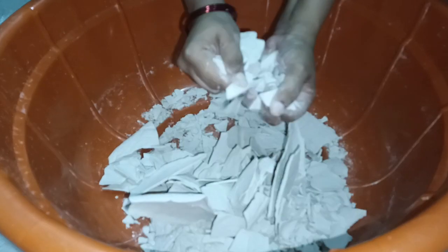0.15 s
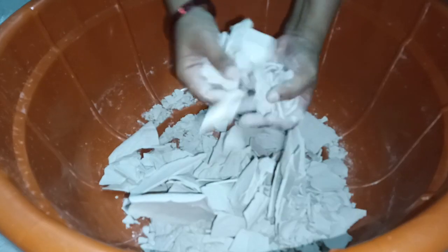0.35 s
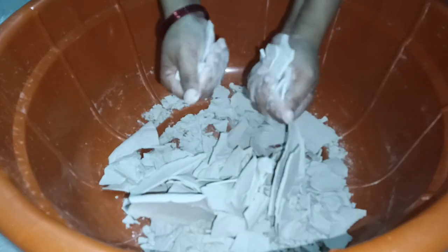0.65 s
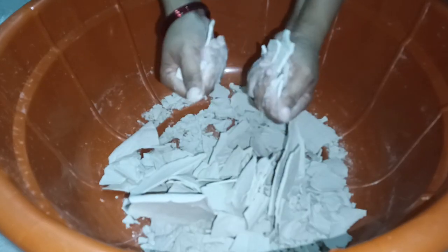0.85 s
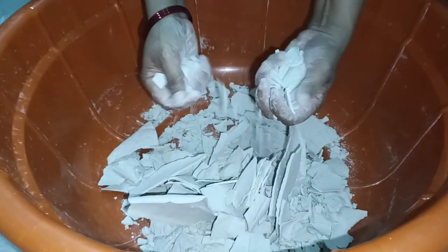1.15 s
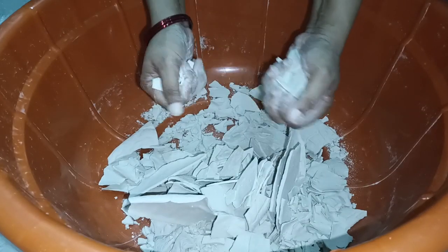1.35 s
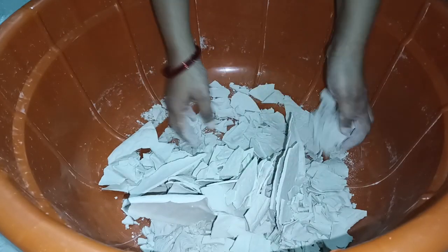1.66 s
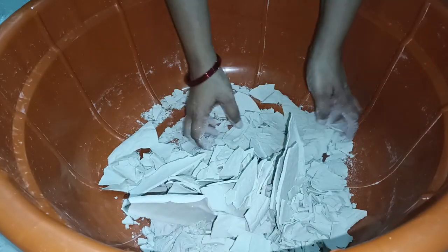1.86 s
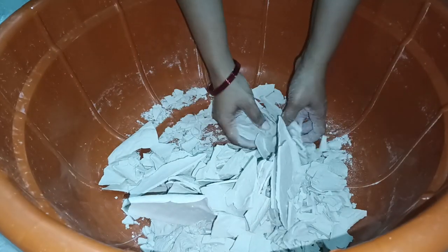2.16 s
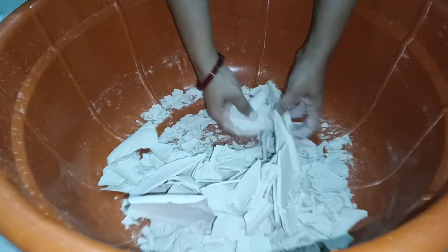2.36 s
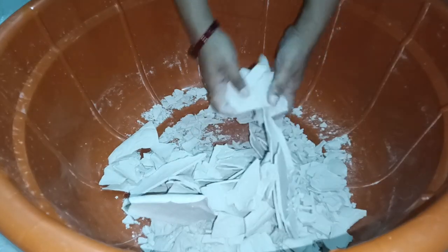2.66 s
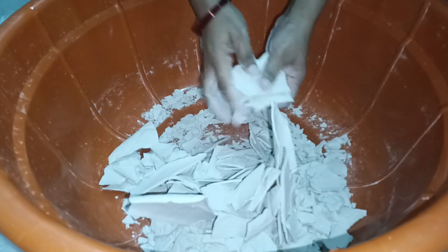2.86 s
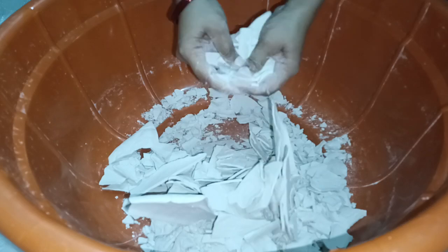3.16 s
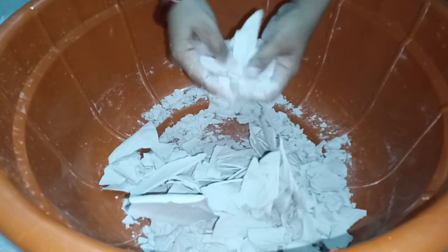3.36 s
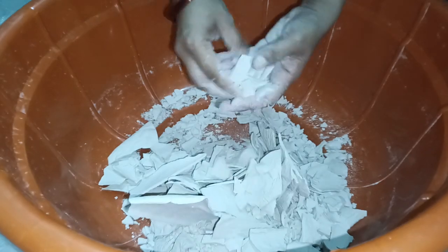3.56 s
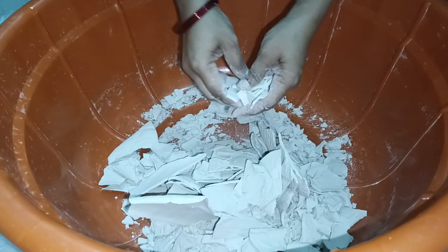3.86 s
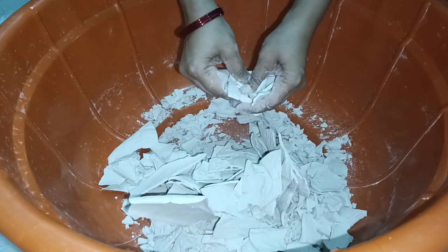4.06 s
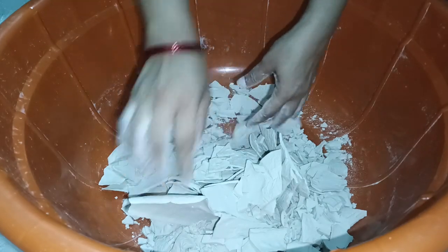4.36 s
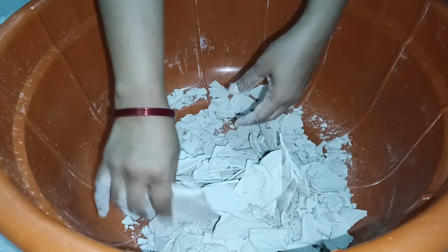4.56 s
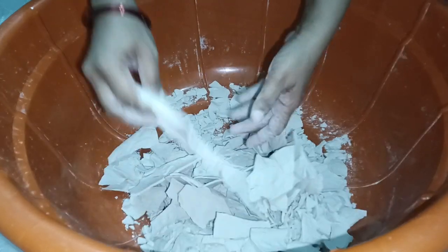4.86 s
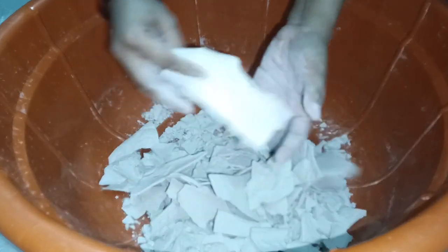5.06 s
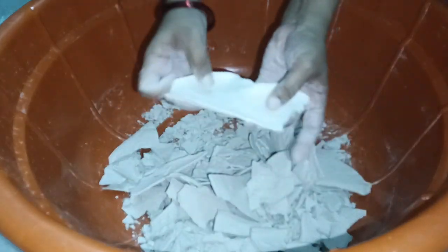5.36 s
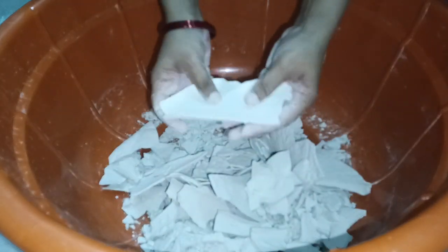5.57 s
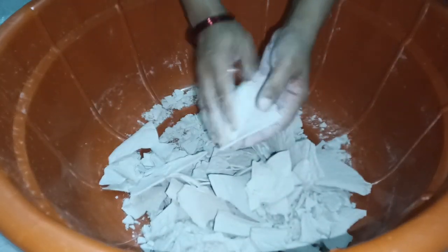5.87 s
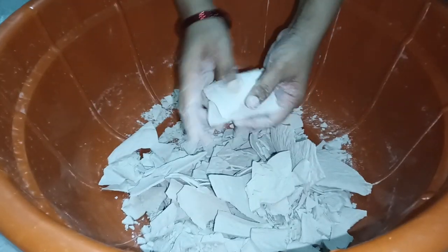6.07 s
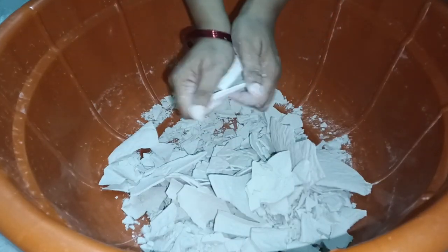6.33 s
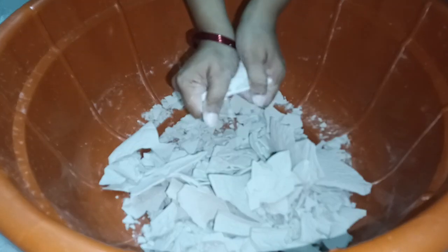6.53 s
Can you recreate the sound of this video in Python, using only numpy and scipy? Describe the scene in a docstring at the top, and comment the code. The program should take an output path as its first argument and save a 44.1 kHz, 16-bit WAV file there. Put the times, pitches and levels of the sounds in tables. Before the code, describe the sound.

Dry clay is crushed by hand close to a stereo microphone, over a plastic basin in a bare room with a short, slightly hollow echo. From 0 to 0.3 s, thin bright snaps and gritty grinding; from 0.5 to 0.75 s, a dense burst of hard cracks with chunks knocking the tub. A crack at 1.0 s, then crunching and clacks around 1.2-1.45 s. From 1.63 to 2.3 s, thick crumbling, strong knocks and sliding rubble, with a soft low bump at 2.0 s. Lighter crackling and knocks run from 2.4 to 4.1 s, snappier near 2.9-3.3 s. A loud crunch and clunk at 4.4-4.5 s is followed by faint rustling, then a solid break with a low bump around 5.2 s. Near quiet with tiny ticks until sharp snaps at 6.48 s and small ones until 6.65 s. Faint hiss and hum underneath.

```python
"""Two hands crush brittle slabs of dry clay over a wide plastic basin in a bare room.
From the start, filtered noise bursts crack the slabs and dense random grains grind crumbs in the fingers.
Soon chunks strike the basin as decaying sine modes and rubble taps slide on the heap; later the basin rocks.
A run of cracks ends the scene. Decaying sparse taps form the room; steady hiss and hum lie beneath,
and a pair of microphone ports hears it, the right one first, with a suppressor lowering faint tails."""
import sys
import numpy as np
from scipy import signal
from scipy.io import wavfile
from scipy.ndimage import uniform_filter1d

SR = 44100
rng = np.random.default_rng(int(sys.argv[2]) if len(sys.argv) > 2 else 0)


def wav_out(sig):
    """Save sig, one row per channel (or a flat mono array), as 16-bit PCM at SR to the path in sys.argv[1]."""
    wavfile.write(sys.argv[1], SR, np.round(np.clip(np.atleast_2d(sig).T, -1, 1) * 32767).astype(np.int16))


N = 295470

# Cracks in the hands: time_s, level_db (before side and layer gains), treble_share (0-1), ring_hz
CRACKS = [(0.0024, -16, 0.73, 2160), (0.1176, -17, 0.68, 5300), (0.205, -15.5, .9, 6400),
          (0.271, -20, 0.85, 5380), (0.508, -22, 0.99, 5240), (0.573, -20, 0.7, 1400),
          (0.627, -15, 0.17, 1540), (0.669, -10.5, 0.59, 6350), (0.736, -14, 0, 1730),
          (0.9961, -13, 0.03, 2300), (1.1817, -26, 0.98, 5140), (1.2994, -14, 0.74, 2780),
          (1.3335, -22, 0.93, 6640), (1.632, -19.5, 0.83, 1800), (1.674, -18, 0.98, 2345),
          (1.774, -16.5, 0, 1540), (1.845, -14, 0.48, 1610), (1.978, -45.5, .3, 2140),
          (2.2712, -19, 0.17, 2170), (2.452, -22.5, 0.7, 2440), (2.56, -15.5, 0.45, 2280),
          (2.635, -27.5, .7, 2100), (2.7954, -25, 0.07, 2070), (2.8604, -22.5, 0, 4260),
          (2.932, -13.5, 0.16, 4300), (3.1227, -19, 0.71, 2150), (3.159, -13.5, 0.77, 2860),
          (3.1777, -16.5, 0.75, 2360), (3.232, -22.5, 0, 5000), (3.2807, -29.5, 0.05, 3380),
          (3.3013, -23, 1, 6220), (3.607, -20, 0.8, 5990), (3.677, -26.5, 0.4, 2700),
          (3.802, -25, 0.54, 1750), (3.845, -18.5, 0, 4500), (3.9586, -19, 0.93, 6700),
          (4.033, -23, 0.99, 7600), (4.123, -27.5, 0.97, 5210), (4.4135, -10.5, 0.72, 1660),
          (4.484, -16.5, 0.5, 1410), (4.902, -25, .1, 3100), (5.188, -24.5, 0.14, 2500),
          (5.2251, -12, 0, 1847), (5.261, -24.5, .1, 2300), (5.7056, -35.5, 0.95, 2780),
          (5.911, -23, 0.82, 2130), (5.947, -29, 0.53, 3230), (5.967, -35.5, 0.52, 4400),
          (6.222, -30.5, 0.86, 2680), (6.2438, -30, 0.5, 1640), (6.316, -37, 0.28, 1910),
          (6.4353, -34.5, 0.52, 1840), (6.449, -37.5, 0.26, 1700), (6.483, -11, 0.7, 3780),
          (6.503, -15, 0.68, 1740), (6.625, -24.5, 1, 5460), (6.6425, -24, 0, 1980)]
# Spectrum of breaking clay: frequency_hz, relative_level_db
CLAY_SPECTRUM = [(400, -23), (900, -18), (1400, -4), (2000, 5.5), (2800, 8.5), (5000, 7), (6400, 7.5),
                 (9000, -3.5), (13000, -18), (14200, -14.5), (15500, -11)]
RING_FULL_HZ = 3120  # smaller, higher pieces ring less

# Squeezes that grind crumbs: start_s, swell_s, hold_s, level_db, treble_share (0-1)
SQUEEZES = [(0.0, 0.0026, 0.032, -41, 1), (0.068, 0.022, 0.11, -34, 0.9), (0.374, 0.01, 0.053, -45, 1),
            (0.506, 0.023, 0.14, -36.5, 0.97), (0.554, 0.19, 0.065, -31, 0.98),
            (1.155, 0.045, 0.08, -42.5, 1), (1.228, 0.14, 0.012, -31, 0.82),
            (1.652, 0.014, 0.59, -30.5, 0.71), (2.416, 0.017, 0.55, -38.5, 0.77),
            (2.936, 0.016, 0.31, -41.5, 0.93), (3.039, 0.15, 0.063, -31.5, 0.84),
            (3.489, 0.021, 0.038, -48.5, 0.93), (3.605, 0.0099, 0.024, -34, 0.95),
            (3.803, 0.085, 0.2, -42.5, 0.92), (4.396, 0.034, 0.011, -26, 0.92),
            (4.691, 0.17, 0.15, -45, 0.77), (5.165, 0.012, 0.032, -44, 0.8),
            (6.36, 0.023, 0.021, -61.5, 0.4), (6.493, 0.016, 0.013, -39.5, 0.6)]
SQUEEZE_SWELL_DB, SQUEEZE_SAG_DB_PER_S, SQUEEZE_FADE_DB_PER_S = 14.5, 8, 126.5

# Chunks landing in the basin: time_s, peak_db (before the room), weight_db (bass share), chunk_hz
LANDINGS = [(0.101, -31.5, -33, 1130), (0.623, -10, -19.5, 896), (0.668, -14, -16, 1080),
            (0.736, -10, -6.5, 1090), (0.995, -16.5, -80.5, 1088), (1.283, -33.5, -60, 870),
            (1.37, -10, -17.5, 1052), (1.389, -17.5, 4, 810), (1.427, -19, -20, 438),
            (1.633, -27, -29, 526), (1.678, -12, -4, 1060), (1.773, -9.5, -41, 880),
            (1.802, -5, -30.5, 840), (1.848, -13, -11, 850), (1.998, -25, 0.5, 730),
            (2.089, -28, -39, 1040), (2.247, -17.5, -24, 904), (2.457, -21, -46, 1066),
            (2.548, -16.5, -45, 876), (2.806, -24.5, -48.5, 1080), (2.93, -15, -12, 910),
            (3.061, -22, -38, 1080), (3.679, -38, -40, 1196), (3.846, -15, -56, 960),
            (3.935, -33, -48, 1220), (4.072, -46.5, -54, 840), (4.414, -11.5, -4, 1034),
            (4.439, -12.5, -26, 1033), (4.479, -21.5, 11, 1050), (4.731, -14.5, -33, 1013),
            (5.188, -26.5, -34, 849), (5.226, -14, -38, 1015), (5.258, -21, 4.5, 726),
            (5.913, -46.5, -56, 1338), (6.223, -42.5, -55, 814), (6.314, -41.5, -41, 1303),
            (6.484, -33.5, -50, 522)]
# Modes of basin and heap: frequency_hz (before detuning), relative_level_db, t60_s
BASIN_MODES = [(195.7, -7, 0.12), (255, -5.5, 0.067), (366, -4.5, 0.053), (511, -1, 0.072),
               (566.5, -17, 0.38), (814, -3, 0.034), (1130, 10.5, 0.009), (1440, -1, 0.0079),
               (1983, -10, 0.054)]

# Slides of rubble on the heap: start_s, swell_s, hold_s, level_db
SLIDES = [(.09, 0.013, 0.019, -52.5), (.59, 0.13, 0.14, -31.5), (1.0, 0.012, 0.015, -43.5),
          (1.3, 0.1, 0.04, -34.5), (1.65, 0.021, 0.23, -30), (1.77, 0.029, 0.59, -26),
          (2.44, 0.02, 0.71, -37.5), (2.93, 0.027, 0.12, -39.5), (3.61, 0.0053, 0.11, -60),
          (3.85, 0.035, 0.022, -41.5), (4.4, 0.036, 0.12, -25.5), (4.62, 0.027, 0.31, -40),
          (5.19, 0.05, 0.0082, -28.5)]
SLIDE_SWELL_DB, SLIDE_SAG_DB_PER_S, SLIDE_FADE_DB_PER_S = 20, 29.5, 151
# Spectrum of rubble on the heap: frequency_hz, relative_level_db
HEAP_SPECTRUM = [(40, -38.5), (124, -23.5), (193, -16.5), (314, -15), (490, -1), (637, -2.5), (828, -1),
                 (1270, -9), (2200, -9), (4000, -18), (6500, -58.5), (11000, -120)]

# Rocking of the basin on the floor: time_s, envelope_peak_db, pitch_hz
ROCKS = [(1.999, -40.5, 78), (2.63, -55, 55.3), (5.258, -40.5, 95.7)]
ROCK_S = 0.012  # time from onset to envelope peak

# Reverberation of the room: frequency_hz, t60_s (before the air in the basin lengthens it)
ROOM_DECAY = [(150, 0.35), (500, 0.23), (1200, 0.36), (3000, 0.42), (7000, 0.43), (14000, 0.33)]
# Lingering resonances of the air in the basin: frequency_hz, width_hz
BOWL_AIR = [(800, 60), (1050, 33), (1350, 50), (1770, 45), (2070, 40), (2680, 45), (3260, 15)]
TAIL_TURN_S = 0.7  # half a turn of the crossfade between tails

# Balance of the ports: frequency_hz, left_minus_right_db
PORT_BALANCE = [(60, -4.5), (180, 10), (550, 8), (1650, 3), (4970, -1.5), (15000, 1)]
# Suppressor threshold: frequency_hz, power_db
SUPPRESSOR_THRESHOLD = [(200, -88.5), (1000, -81.5), (3000, -69.0), (10000, -85)]
# Spectrum of the hiss: frequency_hz, relative_level_db
HISS_SPECTRUM = [(30, -18.5), (100, -7.5), (300, -9), (900, -18), (2000, -28.5), (6000, -28.5),
                 (12000, -35)]
HISS_DB = -69.5
HUM_HZ, HUM_DB = 100, -84  # mains hum
LEFT_LAG = 43  # samples
EDGE_HZ = 16100  # upper band limit


def amp(db):
    """Logarithmic level: decibels become a linear amplitude gain."""
    return 10 ** (np.asarray(db) / 20)


def evened(x):
    """Normalisation: scales a signal to an rms of one."""
    return x / np.sqrt(np.mean(x ** 2) + 1e-20)


def read(points, hz):
    """Interpolation: reads a curve on a log-frequency axis."""
    f, value = np.transpose(points)
    return np.interp(np.log(hz + 1), np.log(f + 1), value)


def colour(x, points, order=0):
    """Minimum-phase filtering at unit energy; order < 0 keeps below 4.5 kHz, order > 0 above."""
    hz = abs(np.fft.fftfreq(4096, 1 / SR))
    split = 1 / (1 + ((hz + 1) / 4500) ** -float(order))
    log_gain = np.log(amp(read(points, hz)) * np.sqrt(split) + 1e-5)
    # The Hilbert transform of the log gain supplies the causal phase.
    response = np.exp(np.conj(signal.hilbert(log_gain)))
    taps = np.fft.ifft(response).real[None, :2048]
    return signal.oaconvolve(x, taps / np.linalg.norm(taps), axes=1)[:, :N]


def pair(shared):
    """Partial coherence: two noises with a given correlation, one per port."""
    a, b = rng.standard_normal((2, N))
    shared = np.clip(shared, 0, 1)
    return np.array([a, shared * a + np.sqrt(1 - shared ** 2) * b])


def grains(per_s, spread_db, length_s, clump_db):
    """Clustered random impulses: envelope of many small and a few large bursts, each with its own side."""
    drift = evened(uniform_filter1d(rng.standard_normal(N), size=600))
    clumps = amp(clump_db * drift)
    size = amp(spread_db * np.minimum(rng.exponential(1, N), 3.))
    size *= rng.random(N) < per_s / SR * clumps / clumps.mean()
    side = amp(np.outer([1, -1], 2.0 * rng.standard_normal(N)))
    fade = [1, -np.exp(-1 / (length_s * SR))]
    # Two equal one-pole decays round the onset.
    once = signal.lfilter([1], fade, size * side)
    return evened(signal.lfilter([1], fade, once))


def spells(rows, swell_db, sag_db_per_s, fade_db_per_s, share=1):
    """Power summation of overlapping spells: each swells to its level, sags, then dies away."""
    start, swell, hold, db = np.transpose(rows)[:4, :, None]
    t = np.arange(0, N + 32, 32) / SR - start  # one point every 32 samples
    rising = np.clip(1 - t / np.maximum(swell, .003), 0, 1)
    lasting = np.clip(t - swell, 0, hold)
    fading = np.maximum(t - swell - hold, 0)
    level_db = db - swell_db * rising - sag_db_per_s * lasting - fade_db_per_s * fading
    gain = share * (t >= 0) * amp(level_db)
    total = np.sqrt((gain ** 2).sum(0))
    return np.interp(np.arange(N) / 32, np.arange(t.shape[1]), total)


def rung(x, resonances, ring_db, change_db):
    """Resonant excitation: adds the ring of the spot struck, changing every few milliseconds."""
    out = x.copy()
    for hz, width in resonances:
        drift = evened(uniform_filter1d(rng.standard_normal(N), size=400))
        struck = x * amp(change_db * drift + ring_db)
        out += signal.lfilter(*signal.iirpeak(hz, hz / width, SR), struck)
    return out


def chips(level, per_s, low_hz, high_hz, cycles, spread_db, count=24):
    """Damped oscillation: loose pieces knock, each size ringing a few cycles at its own pitch."""
    size = amp(spread_db * np.minimum(rng.exponential(1, N), 3.))
    size *= rng.random(N) < per_s / SR
    side = amp(np.outer([1, -1], 1.0 * rng.standard_normal(N)))
    piece = rng.integers(0, count, N)
    out, t = np.zeros((2, N)), np.arange(2048) / SR
    for k, hz in enumerate(np.geomspace(low_hz, high_hz, count)):
        turns = hz * t
        phase = 2 * np.pi * (turns + rng.random((2, 1)))
        knock = turns * np.exp(-turns / cycles) * np.sin(phase)
        blows = size * side * (piece == k)
        out += signal.oaconvolve(blows, knock / np.linalg.norm(knock), axes=1)[:, :N]
    return level * evened(out)


def clay(body, treble):
    """Spectral splitting: the body and the treble of breaking clay, filtered apart."""
    return colour(body, CLAY_SPECTRUM, order=-6) + colour(treble, CLAY_SPECTRUM, order=6)


def cracks():
    """Brittle fracture: milliseconds of splintering noise, then the piece rings; dull knocks are shorter."""
    body, treble, ring = np.zeros((3, 2, N + SR))
    splinters = pair(0.05)
    sides = 2 * rng.standard_normal(len(CRACKS))  # dB
    t, turns = np.arange(2500) / SR, rng.random((len(CRACKS), 2, 1))
    for (s, db, share, hz), side_db, turn in zip(CRACKS, sides, turns):
        share = np.clip(share, 0, 1)
        length = 0.001107 + 0.0029 * share  # seconds
        u = t / length
        at = max(round((s - 1.05 * length) * SR), 0)
        span = slice(at, at + len(u))
        noise = splinters[:, min(at, N - len(u)):][:, :len(u)]
        burst = u ** 1.98 * np.exp(-1.6 * u) * noise
        burst *= np.sqrt(length * SR) / np.linalg.norm(burst, axis=1)[:, None]
        burst *= amp(db + np.array([[side_db], [-side_db]]))
        body[:, span] += burst * np.sqrt(1.02 - share ** 2)
        treble[:, span] += burst * share
        envelope = (1 - np.exp(-t / 0.0013)) * np.exp(-hz * t / 5.6)
        strength = amp(db) * min(1, (RING_FULL_HZ / hz) ** 2) * (1.1 - share)
        ring[:, span] += strength * envelope * np.sin(2 * np.pi * (hz * t + turn))
    return amp(-4.5) * clay(body[:, :N], treble[:, :N]) + amp(2.0) * ring[:, :N]


def grinding():
    """Granular friction: dense small fractures under the fingers, with loose chips knocking."""
    share = np.clip(np.array(SQUEEZES)[:, -1:], 0, 1)
    shape = SQUEEZE_SWELL_DB, SQUEEZE_SAG_DB_PER_S, SQUEEZE_FADE_DB_PER_S
    body = spells(SQUEEZES, *shape, np.sqrt(1.02 - share ** 2))
    treble = spells(SQUEEZES, *shape, share)
    drive = grains(per_s=300.0, spread_db=8.0, length_s=0.0012, clump_db=3.5) * pair(0.066)
    loose = chips(body, 160., 1630.0, 7110.0, cycles=1.5, spread_db=1.3)
    return clay(drive * body, drive * treble) + amp(-2.0) * loose


def landings():
    """Modal excitation: a chunk rings and stirs modes near its pitch; heavy ones add thud and low modes."""
    hz, mode_db, t60 = np.transpose(BASIN_MODES)[:, :, None]
    t, out = np.arange(SR // 5) / SR, np.zeros((2, N + SR))
    spots = rng.standard_normal((len(LANDINGS), 2, len(BASIN_MODES), 1))
    band = signal.butter(4, [150., 520.], "band", fs=SR, output="sos")
    thuds = evened(signal.sosfilt(band, rng.standard_normal((len(LANDINGS), len(t)))))
    for (s, db, weight_db, chunk_hz), (apart, detune), thud in zip(LANDINGS, spots, thuds):
        # Low modes follow the weight; the others fall by 14 dB per octave from the chunk.
        favour_db = np.where(hz < 450, weight_db, -14. * abs(np.log2(hz / chunk_hz)))
        modes = amp(mode_db + favour_db - 60 * t / t60) * (1 - np.exp(-t * hz / 0.77)) ** 2
        detuned_hz = hz * (1 + (0.024 + 7.2 / hz) * detune)
        modes = modes * np.sin(2 * np.pi * detuned_hz * t)
        rings_s = 0.025 * (1 + .4 * max(-29.0 - db, 0))  # faint landings ring longer
        chunk = amp(-0.5 - 60 * t / rings_s) * (1 - np.exp(-t * chunk_hz / 1.1)) ** 2
        chunk = chunk * np.sin(2 * np.pi * chunk_hz * t)
        chunk = chunk + amp(weight_db - 6.5 - 60 * t / 0.15) * np.minimum(t / 0.0033, 1) * thud
        blow = np.array([chunk + (modes * amp(4.5 * side * apart)).sum(0) for side in (1, -1)])
        out[:, round(s * SR):][:, :len(t)] += amp(db) * blow / abs(blow).max()
    return out[:, :N]


def rubble():
    """Random impact excitation: tumbling pieces tap dully and ring the basin here and there."""
    level = spells(SLIDES, SLIDE_SWELL_DB, SLIDE_SAG_DB_PER_S, SLIDE_FADE_DB_PER_S)
    drive = grains(per_s=940.0, spread_db=8.5, length_s=0.0034, clump_db=1.5) * pair(0.37)
    taps = level * colour(drive, HEAP_SPECTRUM)
    resonances = [(hz, 3.24 / t60) for hz, _, t60 in BASIN_MODES]  # centre and width in Hz
    loose = chips(level, 83.0, 414.0, 2094.0, cycles=2.2, spread_db=11.0)
    return rung(taps, resonances, ring_db=-8.0, change_db=5.0) + amp(-6.5) * loose


def rocks():
    """Damped low oscillation: slow, soft pushes of the whole basin."""
    t, out = np.arange(SR // 4) / SR, np.zeros(N)
    for s, db, hz in ROCKS:
        envelope = np.e * t / ROCK_S * np.exp(-t / ROCK_S)
        out[round(s * SR):][:len(t)] += amp(db) * envelope * np.sin(2 * np.pi * hz * t)
    return out


def room(x, count=3):
    """Frequency-dependent reverberation: the echo's tint drifts as three randomly drawn tails crossfade."""
    hz, t, _ = signal.stft(np.zeros(SR), SR, nperseg=1024)
    out, turn = np.zeros((2, N)), np.pi * np.arange(N) / SR / TAIL_TURN_S
    for k in range(count):
        # Sparse taps of random sign, one in every 20 samples.
        taps = np.zeros((2, SR))
        at = np.arange(200, SR - 20, 20) + rng.integers(0, 20, (2, (SR - 201) // 20))
        np.put_along_axis(taps, at, rng.choice([-1., 1.], at.shape), 1)
        z = signal.stft(taps, SR, nperseg=1024)[2]
        held = sum(rng.uniform(.3, 1) * np.exp(-((hz - f) / width) ** 2) for f, width in BOWL_AIR)
        held = held[:, None]
        uneven_db = 1.5 * rng.standard_normal(z.shape[:2] + (1,))  # random unevenness, bin by bin
        t60 = read(ROOM_DECAY, hz)[:, None] * (1 + .45 * held)
        tail = z * amp(3.5 * held + uneven_db - 60 * t / t60)
        tail = signal.istft(tail, SR, nperseg=1024)[1][:, :SR // 2]
        tail = tail * (np.arange(SR // 2) > 200)
        share = np.sqrt(2 / count) * np.cos(turn + np.pi * k / count)
        out += signal.fftconvolve(x * share, tail / np.linalg.norm(tail[0]), axes=1)[:, :N]
    return out


def hiss_and_hum():
    """Stationary background: coloured, nearly incoherent noise and one steady sine."""
    hum = amp(HUM_DB) * np.sin(2 * np.pi * HUM_HZ * np.arange(N) / SR)
    return hum + amp(HISS_DB) * colour(pair(0.037), HISS_SPECTRUM)


def scene():
    """Superposition: the near sources and their reverberation add."""
    near = cracks() + grinding() + landings() + rubble() + rocks()
    return near + amp(-4.0) * room(near)


def record(dry):
    """Two-port reception: balance, downward expansion of faint bins, bass roll-off, delay, band limit."""
    hz, _, z = signal.stft(dry, SR, nperseg=1024, noverlap=768)
    z = z * amp(np.outer([.5, -.5], read(PORT_BALANCE, hz)))[:, :, None]
    power_db = 10 * np.log10(uniform_filter1d(abs(z) ** 2, size=6, axis=2) + 1e-20)
    under_db = np.clip(read(SUPPRESSOR_THRESHOLD, hz)[:, None] - power_db, 0, 12.)
    z = z * amp(-1.8 * under_db)
    heard = signal.istft(z, SR, nperseg=1024, noverlap=768)[1][:, :N]
    heard = signal.sosfilt(signal.butter(2, 70., "high", fs=SR, output="sos"), heard)
    heard[0] = np.r_[np.zeros(LEFT_LAG), heard[0, :-LEFT_LAG]]
    heard = heard + hiss_and_hum()
    band_limit = signal.firwin(511, EDGE_HZ, window=("kaiser", 9), fs=SR)
    return signal.oaconvolve(heard, band_limit[None], "same")


dry = scene()
out = record(dry)
wav_out(out)
```